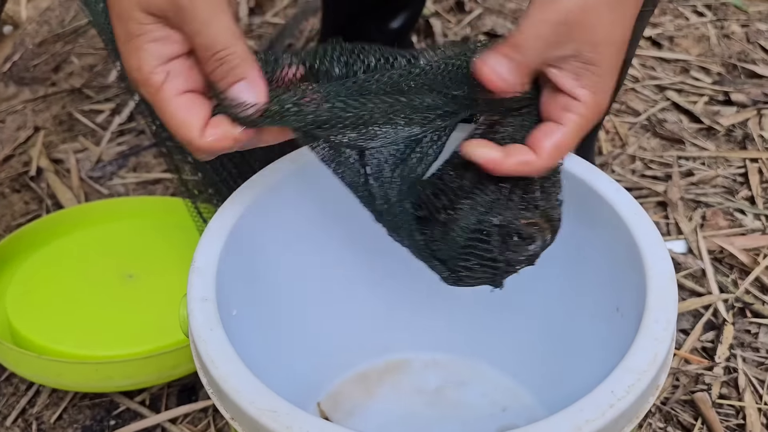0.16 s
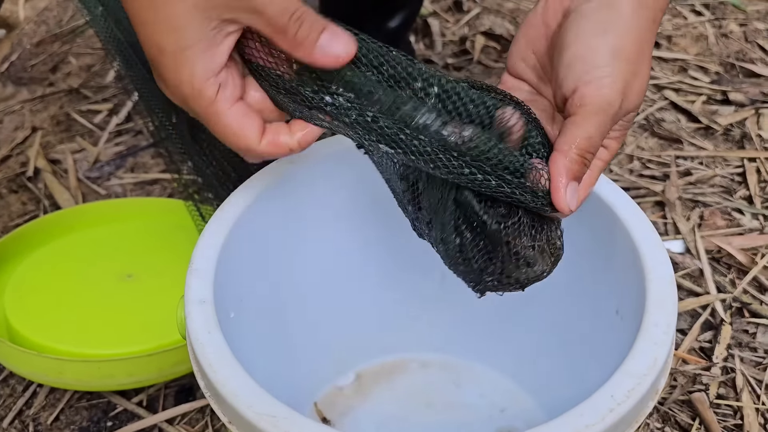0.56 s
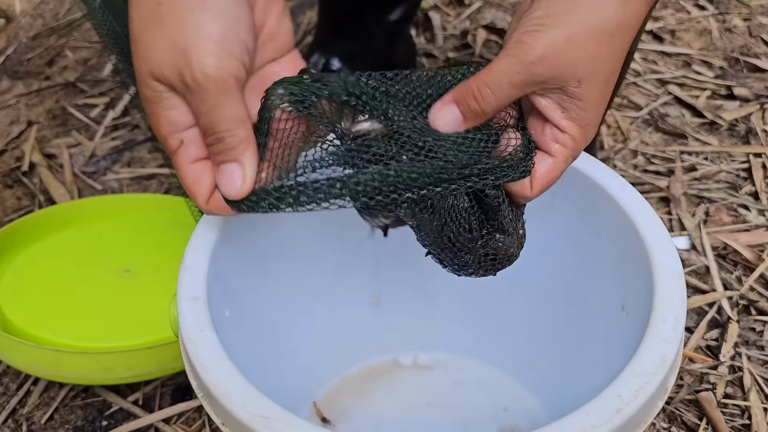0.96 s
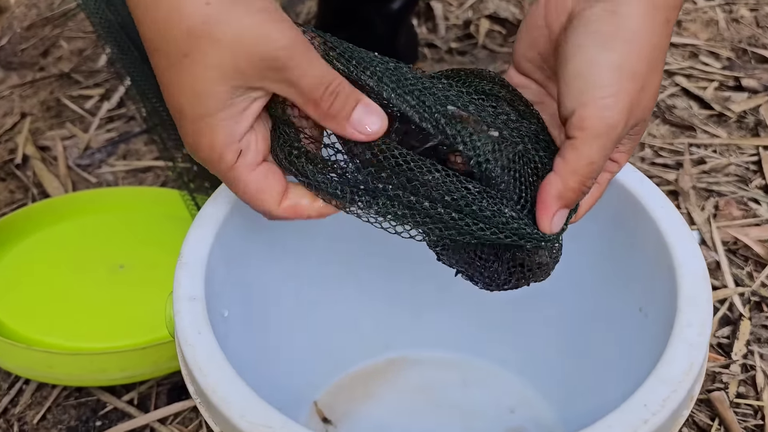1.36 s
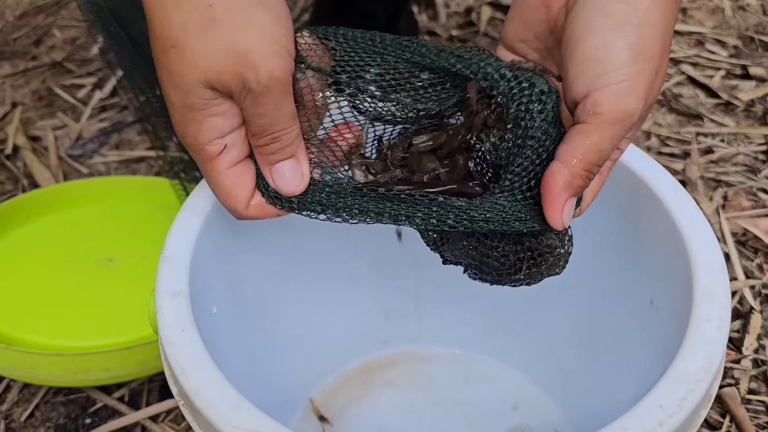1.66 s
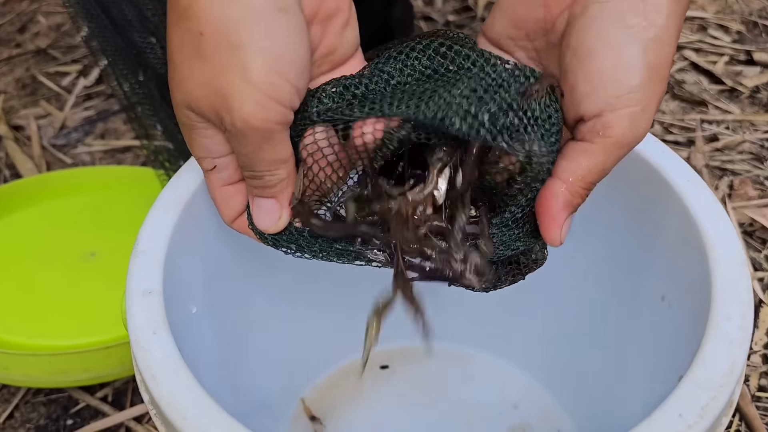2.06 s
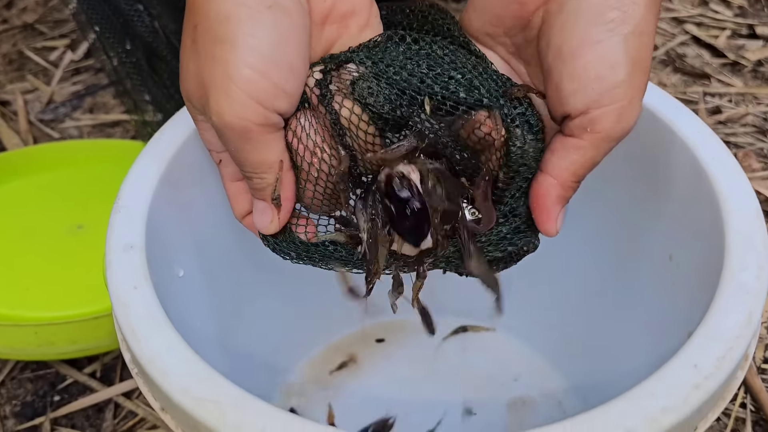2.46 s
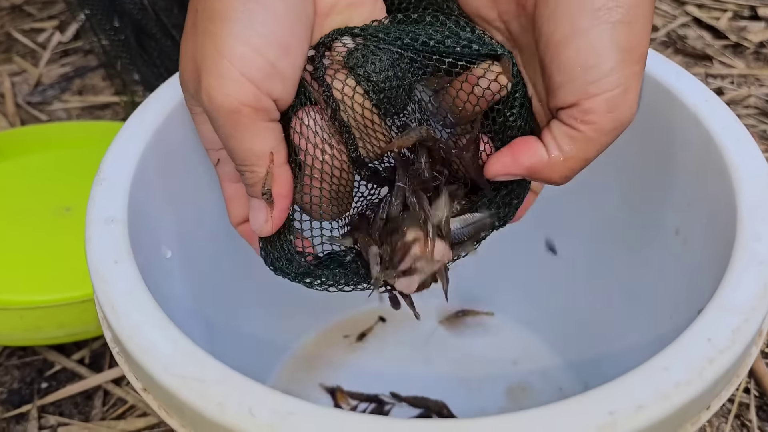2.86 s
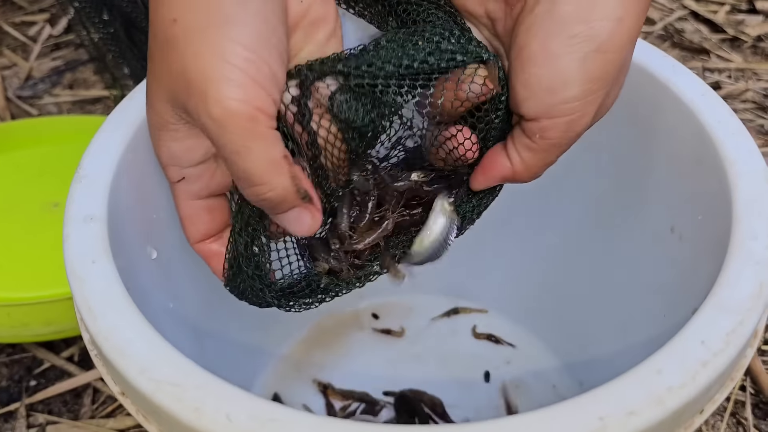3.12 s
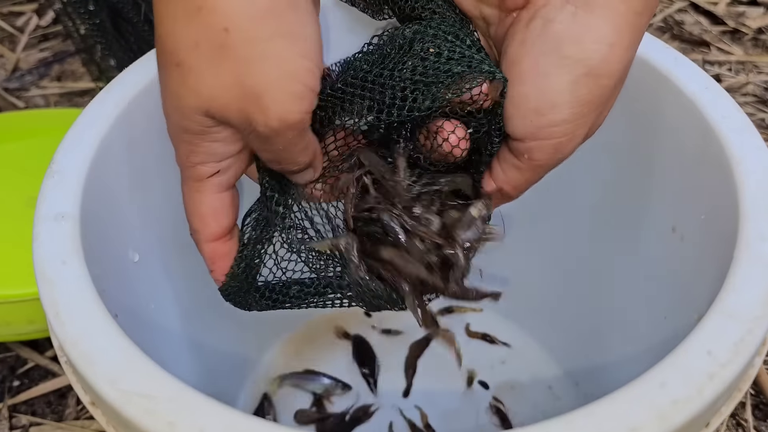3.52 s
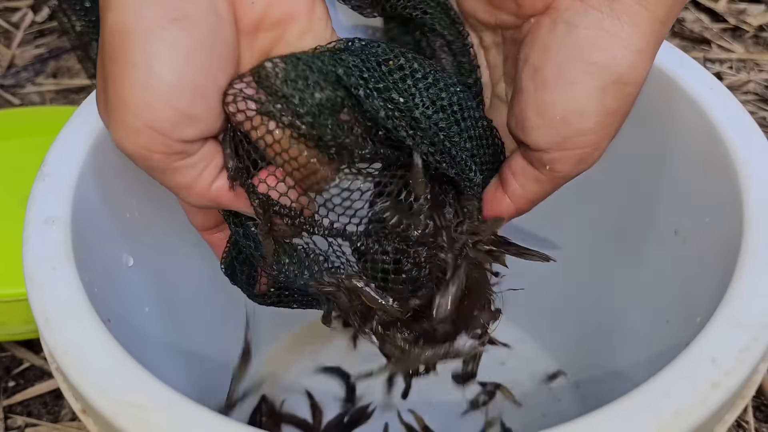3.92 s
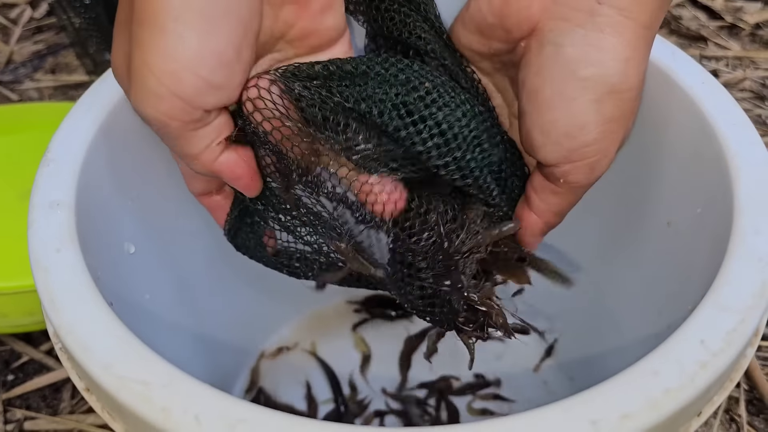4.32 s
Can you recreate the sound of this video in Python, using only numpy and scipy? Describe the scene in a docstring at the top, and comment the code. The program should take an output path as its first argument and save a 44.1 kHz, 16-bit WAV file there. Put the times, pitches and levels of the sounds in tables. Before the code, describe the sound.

Very quiet at first: distant shrilling insects, thin falling bird chirps, soft air, and faint ticks and bumps of a handled wet net. Then the small wet catch spills into a hollow bucket in uneven bursts of dull booms, short knocks and crisp snaps, some overloading the close microphone. Rubbing mesh and tiny flapping kicks continue, a little left of centre, to the end.

```python
"""Distant insects shrill and small birds chirp while hands rub a wet trap net; then its catch drops into a bucket.
Landings are modal synthesis: soft pushes excite damped modes of the hollow, the walls and the shell.
Snaps are short noise bursts ringing the bucket; the mesh is scattered grains; rubbing is jerky filtered noise.
Squirming is a patter of tiny kicks on the same modes. Birds are gliding sines, insects and air shaped noise."""
import sys
import numpy as np
from scipy import signal
from scipy.fft import rfft, irfft
from scipy.io import wavfile
from scipy.ndimage import uniform_filter1d

SR = 44100
rng = np.random.default_rng(int(sys.argv[2]) if len(sys.argv) > 2 else 0)


def transcribe(signal):
    """Save signal, clipped to [-1, 1], as a 16-bit WAV file at the path in sys.argv[1]."""
    frames = np.atleast_2d(signal).T
    limited = np.clip(frames, -1, 1)
    pcm = np.round(limited * 32767).astype(np.int16)
    wavfile.write(sys.argv[1], SR, pcm)


N = 197818  # samples

# Bodies hitting the bucket: (time [s], boom of the hollow [dB], contact [ms], smack over the boom [dB])
LANDINGS = [(0.385, -50.5, 6.7, -5), (0.726, -61, 1.9, 17), (1.17, -49.5, 5.5, 5.5),
            (1.189, -57.5, 2.9, 10.5), (1.773, -52.5, 5.2, 1), (1.844, -55, 3.7, -3),
            (2.255, -32.5, 4.3, 0), (2.2747, -19.5, 4.7, -12.5), (2.2989, -14, 5.6, -13),
            (2.3059, -12, 1.1, -5), (2.3165, -25, 5, -2), (2.3389, -15, 2.5, -18), (2.3598, -20, 1.3, 4.5),
            (2.388, -31, 5.5, 0), (2.46, -44.5, 3, 13), (2.5003, -23.5, 4.2, -8.5), (2.512, -25, 0.62, -7),
            (2.57, -25.5, 0.39, -8), (2.6371, -18.5, 2, -16), (2.6668, -13, 4.2, -21),
            (2.7272, -8, 0.44, -11), (2.7334, -1, 1.3, -9.5), (2.772, -24, 3.1, -5.5),
            (2.8325, -19.5, .5, -13.5), (2.882, -17, 0.4, -1), (2.9217, -27.5, 0.76, -25),
            (2.9745, -34, 2.8, -23), (3.122, -27.5, 1.2, -6.5), (3.1399, -15.5, 7.8, -5),
            (3.1433, -8, 4.7, -14), (3.1688, -6, 0.58, -14), (3.1964, -21, 3.3, -5),
            (3.266, -33.5, 1.3, -4), (3.3496, -21, 3.2, -21.5), (3.362, -26, 4.5, -15),
            (3.384, -28.5, 2.5, -22), (3.4183, -28.5, 1, -6.5), (3.489, -29, 0.62, -2),
            (3.5424, -46.5, 6.3, 13.5), (3.575, -27.5, 3.9, 4), (3.6308, -37, 6.7, 12),
            (3.6439, -40.5, 1, 0), (3.674, -49, 3.4, 15), (3.66, -39, 1.8, 2), (3.6825, -34.5, 2.3, -1.5),
            (3.7077, -26.5, 1.9, -34), (3.7591, -37, 1.1, -33), (3.787, -28, 2, -0.5),
            (3.7998, -34.5, 1.1, -15), (3.832, -49, 2.4, 13), (3.8507, -16.5, 3, -21),
            (3.8718, -32, 6.5, -1.5), (3.9355, -37, 3, -18), (3.973, -29.5, 4.6, -34),
            (3.9968, -33, 1.1, -22), (4.0816, -30.5, 1.2, -19), (4.123, -21.5, 5.65, -13.5),
            (4.156, -21.5, 2, -38), (4.1923, -25, 1.5, -7.5), (4.2664, -31, 1.6, -20),
            (4.302, -27, 4.3, -11), (4.3342, -21, 2.7, -15.5), (4.3558, -29.5, 1, -38),
            (4.395, -29.5, 3.1, -40)]
# The walls' knock relative to the boom [dB], and its rise per dB of smack
KNOCK_DB, KNOCK_FOLLOW = -1, 0.73
# The tail slaps down after the body: least delay [ms], further random delay [ms], level over the smack [dB]
FLOP_MS, FLOP_SPREAD_MS, FLOP_DB = 3.93, 9.0, -9.5


def landings():
    """Superposition: each impact sums a boom, a wall knock and a slap, then a weaker slap of the tail."""
    out = np.zeros((2, N))
    for s, boom_db, contact_ms, smack_db in LANDINGS:
        slap_db = boom_db + smack_db
        knock_db = boom_db + KNOCK_DB + KNOCK_FOLLOW * smack_db
        flop_s = s + (FLOP_MS + FLOP_SPREAD_MS * rng.random()) / 1000
        # the push is centred on the moment of impact
        add(out, s - contact_ms / 2000, amp(boom_db) * boom(contact_ms))
        add(out, s, amp(knock_db) * knock() + amp(slap_db) * slap())
        add(out, flop_s, amp(slap_db + FLOP_DB) * slap())
    return out


# Low modes of the hollow: (frequency [Hz], relative level [dB], t60 [s], sign and size of swing)
HOLLOW = [(165.2, -9.5, 0.11, -1.79), (214.6, 1, 0.043, 1), (314.1, 8, 0.07, -0.8)]


def boom(contact_ms, lowest_hz=125):
    """Contact filtering: a longer push favours deeper modes; a small bucket radiates no deep bass."""
    push = np.hanning(max(round(contact_ms * SR / 1000), 5))
    sound = signal.lfilter(push, 1, ring(HOLLOW, contact_s=0.0004))
    bass_cut = signal.butter(3, lowest_hz, "high", fs=SR, output="sos")
    sound = signal.sosfilt(bass_cut, sound)
    return sound / abs(sound).max()


# Wall modes: (frequency before detuning [Hz], relative level [dB], t60 [s], sign and size of swing)
WALLS = [(579, 4, 0.034, -1.19), (652.5, 6, 0.061, 1), (679, 4, 0.062, 0.61)]


def knock(spread=0.061):
    """Modal response: the damped walls ring at a slightly different pitch for each spot struck."""
    detune = 1 + spread * rng.uniform(-1.26, 1)
    modes = [(hz * detune, *rest) for hz, *rest in WALLS]
    return ring(modes, contact_s=0.0006)


# Crowded upper modes of the shell: (frequency [Hz], level before random blending [dB], t60 [s])
SHELL = [(780, -4.5, 0.015), (1030, -5, 0.0083), (1000, -7.5, 0.066), (1115, -10.5, 0.068),
         (1140, -36, 0.0226), (1399, 1.5, 0.042), (1500, -19.5, 0.053), (1764, -9.5, 0.011)]


def slap(pop_hz=1020, pop_t60=0.0061, pop_db=-2, shell_db=-5, pan_db=-3):
    """Air expulsion and shell resonance: a wet body squeezes out a short pop, and the shell rings on."""
    pop_mode = (pop_hz * rng.uniform(0.75, 1.154), 0, pop_t60, -1)
    pop = ring([pop_mode], contact_s=0.0012)
    shell = blend(SHELL, contact_s=0.000083)
    return (amp(pop_db) * pop + amp(shell_db) * shell) * lean(pan_db)


# Bright wet snaps and flicks, some on their own, some together with a landing:
# (time [s], relative level [dB], body over that [dB], top fizz over that [dB])
SNAPS = [(.402, -40, -30, -9), (0.4668, -37, -11, -5), (0.521, -40.5, -8.5, -2), (0.999, -43, -29, -10),
         (1.279, -41, -7, 1.5), (1.877, -55.5, -11, 9), (1.931, -46, -5, 3.5), (2.1178, -44, 5, -9),
         (2.258, -27.5, -1.5, -2.5), (2.297, -21, 6, -26), (2.3136, -29, 2.5, -3), (2.3797, -39.5, 3, 5.5),
         (2.652, -28, -32, -3.5), (2.7324, -18, 11, -11), (2.8, -35, -13.5, -21), (2.8825, -52, 18.5, -18),
         (2.9866, -34.5, 6, -17), (3.042, -47, .5, 3), (3.1986, -37, 6.5, -5), (3.491, -42, 10.5, -12),
         (3.5555, -33, -5, -3), (3.587, -42.5, 6, 0), (3.65, -38.5, 2.5, -11), (3.8034, -46.5, 10.5, -12),
         (3.829, -47, 14, 6), (3.882, -19.5, -1, -13.5), (4.0085, -43, 5, -6), (4.0677, -39.5, 4, -9),
         (4.125, -31.5, 0.5, -4), (4.172, -19.5, -19, -8), (4.229, -41, 5.5, -20), (4.3322, -34.5, 9, -19),
         (4.426, -36, -32, -5), (4.4585, -33.5, -27, -14)]
# Spectrum of the spray: (frequency [Hz], density [dB per Hz])
SNAP_COLOUR = [(900, -4), (1800, -1), (3000, -0.5), (4500, 2), (7000, -0.5), (8500, 2.5), (10300, -3),
               (11600, 9.5), (13500, 4.5), (16000, 5)]


def snaps(rise_s=0.00009, crack_s=0.0036, echo_s=0.011, echo_db=-16, crackle_db=2.5):
    """Double decay: a brief uneven spray fades fast, then slower as its reflections in the bucket."""
    t = np.arange(SR // 10) / SR
    decay = np.exp(-t / crack_s) + amp(echo_db) * np.exp(-t / echo_s)
    shape = (1 - np.exp(-t / rise_s)) * decay
    out = np.zeros((2, N))
    for s, db, body_db, top_db in SNAPS + wet_landings():
        unevenness = uniform_filter1d(rng.standard_normal(len(t)), size=14)
        clumps = amp(crackle_db * unit(unevenness))
        spray = unit(colour(clumps * rng.standard_normal((2, len(t))), SNAP_COLOUR))
        spray = colour(spray, [(3200, body_db), (5000, 0), (8500, 0), (12000, top_db)])
        add(out, s, in_bucket(amp(db + 4.5) * spray * shape))
    return out


# Snap of each landing: relative level [dB], its rise per dB of boom, and per dB of smack
WET_DB, WET_FOLLOW, WET_SMACK = -25.5, 0.68, 0.19
WET_BODY_DB, WET_TOP_DB = 7, -8  # colour of that snap


def wet_landings():
    """Impact scaling: the wet snap of each landing grows with its boom and its smack."""
    rows = []
    for s, boom_db, _, smack_db in LANDINGS:
        db = WET_DB + WET_FOLLOW * boom_db + WET_SMACK * smack_db
        rows.append((s, db, WET_BODY_DB, WET_TOP_DB))
    return rows


# Bright modes that snaps stir: (frequency [Hz], level before random blending [dB], t60 [s])
BRIGHT = [(2387, 5, 0.013), (2740, -5, 0.0054), (3110, 6.5, 0.014), (3855, -41, 0.026), (3790, 6.5, 0.012),
          (4500, 8, 0.017), (7060, -2.5, 0.023), (9400, -4, 0.013)]


def in_bucket(x, ring_db=-10):
    """Convolution: a crisp sound excites the bright modes of the bucket, which are added to it."""
    modes = blend(BRIGHT, contact_s=0.0016)
    modes = modes / np.linalg.norm(modes[0])
    return x + amp(ring_db) * signal.fftconvolve(x, modes, axes=1)[:, :x.shape[1]]


# Steady level of the catch squirming on the bottom: (time [s], level [dB])
SQUIRM = [(0, -66), (2.2, -79.5), (2.6, -50.5), (3.3, -57), (3.6, -45), (4.48, -54.5)]
# Flurries of tiny kicks when a clump drops in: (start [s], length [s], level before jerks [dB])
FLURRIES = [(2.288, 0.14, -34.5), (3.338, 0.14, -38.5), (3.63, 0.092, -38), (3.792, 0.068, -32),
            (4.103, 0.097, -35.5), (4.25, 0.052, -33.5), (4.336, 0.087, -49.5)]


def squirming():
    """Random impulse excitation: tiny kicks patter on the bucket's modes from four spots on the bottom."""
    patter = np.zeros((2, N))
    for spot in range(4):
        kick = amp(2.5) * boom(contact_ms=4.2) + amp(-0.5) * knock() + slap()
        clicks = grains(per_s=32, spread_db=2.5)
        patter += signal.oaconvolve(clicks[None], kick, axes=1)[:, :N]
    return activity(SQUIRM, FLURRIES, column=1) * unit(patter)


# Steady work on the net: (time [s], ticking before the mesh gain [dB], rubbing of fingers [dB])
HANDLING = [(0, -68, -60.5), (.95, -73, -69), (2.2, -66.5, -61.5), (3.28, -63.5, -60.5),
            (3.5, -58.5, -52.5), (4.48, -62, -62.5)]
# Single tugs and shakes, before jerks:
# (start [s], length [s], ticking before the mesh gain [dB], rubbing of fingers [dB])
TUGS = [(-.02, 0.14, -70, -58), (0.393, 0.13, -59, -71), (0.515, 0.096, -64, -62), (0.767, 0.1, -65, -85),
        (0.981, 0.25, -63.5, -87), (1.186, .08, -71, -74), (1.564, 0.11, -67.5, -60),
        (1.926, 0.14, -60.5, -66.5), (2.28, .17, -53.5, -49), (2.63, 0.088, -56.5, -51),
        (2.936, 0.072, -58.5, -64), (3.117, 0.11, -50.5, -43), (3.329, 0.15, -55, -58),
        (3.548, 0.06, -69, -44.5), (3.703, 0.22, -56, -55), (4.108, 0.11, -60, -48.5)]
# Spectrum of the mesh: (frequency [Hz], filter gain [dB])
MESH = [(300, -7), (900, -47), (1500, -21.5), (2500, -4), (4000, 3), (7000, 4.5), (8500, 8), (10300, -0.5),
        (11600, 7.5), (13500, 2), (16000, 6.5)]


def net(scatter_s=0.0032, echo_s=0.0092, echo_db=-12, mesh_db=8):
    """Incoherent scattering: wet threads tick over fingers and shells, and each tick scatters in the bucket."""
    t = np.arange(SR // 40) / SR
    scatter = np.exp(-t / scatter_s) + amp(echo_db) * np.exp(-t / echo_s)
    ticks = grains(per_s=1100, spread_db=3.3)
    # every tick is a puff of noise of its own, so their powers add
    power = np.maximum(signal.oaconvolve(ticks ** 2, scatter ** 2)[:N], 0)
    rustle = unit(colour(np.sqrt(power) * rng.standard_normal((2, N)), MESH))
    return amp(mesh_db) * activity(HANDLING, TUGS, column=1) * rustle


# Spectrum of the rubbing: (frequency [Hz], filter gain [dB])
RUB = [(300, -2), (700, -7.5), (1400, -1), (2500, -5), (3600, -4), (6000, -9), (12000, -33)]


def rubbing():
    """Stick-slip friction: fingers drag on the wet mesh in small uneven slips."""
    slips = amp(2.5 * drift(rate_hz=200))
    drag = colour(rng.standard_normal((2, N)), RUB) * slips
    return activity(HANDLING, TUGS, column=2) * unit(drag)


# Falling chirps of the nearer small birds: (time at the middle [s], middle pitch before rasp [Hz], level [dB])
CHIRPS = [(.086, 5570, -49.5), (.12, 5900, -52), (.179, 5910, -46.5), (.311, 5700, -53), (.469, 5800, -49),
          (.81, 5860, -49.5), (1.24, 6220, -53), (1.375, 5880, -53.5), (1.595, 5340, -51),
          (1.663, 5990, -46), (2.07, 5600, -47), (2.409, 5920, -46.5), (2.556, 5770, -49.5),
          (2.715, 5870, -48), (3.105, 6160, -47), (3.732, 5830, -44.5)]


def birds(chirp_s=0.038, fall_hz=850, rasp_hz=170, echo_db=-3, flock_db=-59):
    """Frequency modulation and diffusion: raspy falling chirps, a fainter flock and whistles, blurred by trees."""
    u = np.linspace(-.5, .5, round(chirp_s * SR))
    envelope = np.cos(np.pi * u) ** 2
    song = np.zeros((1, N))
    rasp = rasp_hz * drift(rate_hz=290)
    flock = [(when * (N / SR - .1), 5400 + 700 * height, flock_db)
             for when, height in rng.random(size=(24, 2))]
    for s, hz, db in [*CHIRPS, *flock]:
        fall = fall_hz * rng.uniform(0.39, 1.47) * u
        pitch = hz - fall + np.roll(rasp, -round(s * SR))[:len(u)]
        add(song, s - chirp_s / 2, amp(db) * glide(pitch) * envelope)
    song += whistles()
    t = np.arange(SR // 4) / SR
    # decaying noise, independent at the two ears
    trees = unit(rng.standard_normal((2, len(t))) * np.exp(-t / 0.063)) / np.sqrt(len(t))
    return song + amp(echo_db) * signal.oaconvolve(song, trees, axes=1)[:, :N]


# A far bird's drawn-out whistles, before waver and flutter:
# (start [s], length [s], pitch at the ends [Hz], rise in the middle [Hz], level [dB])
WHISTLES = [(0.098, 0.287, 2127, -40.5, -65), (0.499, 0.24, 2020, 45.5, -70.5),
            (3.006, 0.28, 1750, 201.5, -59)]


def whistles(waver_hz=35, waver_share=0.38, flutter_db=3.5):
    """Joint pitch and level modulation: each whistle follows one arch; a wider bend wavers more."""
    song = np.zeros((1, N))
    for s, length, hz, rise_hz, db in WHISTLES:
        arch = np.sin(np.linspace(0, np.pi, round(length * SR))).clip(0)
        waver = (waver_hz + waver_share * abs(rise_hz)) * drift(rate_hz=130)[:len(arch)]
        pitch = hz + rise_hz * arch + waver
        level = amp(db + flutter_db * drift(rate_hz=32)[:len(arch)]) * np.sqrt(arch)
        add(song, s, level * glide(pitch))
    return song


# Spectrum of the insect chorus: (frequency [Hz], density [dB per Hz])
INSECTS = [(3700, -38), (4050, -9.5), (4300, 5), (4750, 3), (5200, -4.5), (5900, -7.5), (6400, -14),
           (6800, -32), (7200, 0.5), (7600, -15.5), (9000, -67)]
INSECTS_DB = -56  # level before the shimmer


def insects():
    """Amplitude modulation: narrow bands of noise shimmer as a distant chorus."""
    chorus = unit(colour(rng.standard_normal((2, N)), INSECTS))
    shimmer = amp(1.17 * drift(rate_hz=140))
    return amp(INSECTS_DB) * chorus * shimmer


# Spectrum of the outdoor air: (frequency [Hz], filter gain [dB])
AIR = [(20, -6), (60, 5), (150, 2), (300, -16), (450, 2.5), (680, 2), (1100, -13), (2000, -10), (3200, -5),
       (6500, -41), (8500, -22), (10300, -54), (12000, -2.5), (16000, 3.5)]
AIR_DB = -61.5  # level before the breeze and the lean to the left


def outdoor_air():
    """Interaural coherence: soft noise shared by both ears mostly below the treble, slowly swaying in level."""
    shared = colour(rng.standard_normal(N), [(100, 7.0), (700, 2.0), (1500, 12.0), (4000, -2)])
    breeze = amp(0.8 * drift(rate_hz=4))
    air = unit(colour(rng.standard_normal((2, N)) + shared, AIR)) * breeze
    return amp(AIR_DB) * air * lean(1.8)


def ring(modes, contact_s):
    """Modal superposition: decaying sines after a soft push, scaled to peak 1."""
    t = np.arange(SR // 9) / SR
    sound = np.zeros(len(t))
    for hz, db, t60, way in modes:
        sound += way * amp(db - 60 * t / t60) * np.sin(2 * np.pi * hz * t)
    sound *= 1 - np.exp(-t / contact_s)
    return sound / abs(sound).max()


def blend(modes, contact_s):
    """Mode participation: each spot stirs the modes differently, and each ear hears another blend."""
    ways = rng.standard_normal(len(modes)) + 0.54 * rng.standard_normal((2, len(modes)))
    ears = [[(*mode, way) for mode, way in zip(modes, ear)] for ear in ways]
    return np.array([ring(ear, contact_s) for ear in ears])


def activity(steady, rows, column, uneven_db=3.0):
    """Power addition: gain of a steady activity together with its bouts, which come in uneven jerks."""
    jerks = amp(uneven_db * drift(rate_hz=54))
    return np.hypot(amp(curve(steady, column)), bouts(rows, column + 1) * jerks)


SWELL_S, EASE_S = 0.017, 0.053  # full build-up and fade of a tug or a flurry


def bouts(rows, column):
    """Envelope shaping: gain of timed bouts that each swell, hold and ease off."""
    t, gain = np.arange(N) / SR, np.zeros(N)
    for row in rows:
        start, length = row[:2]
        ramp = np.clip(np.minimum((t - start) / SWELL_S, (start + length - t) / EASE_S), 0, 1)
        gain += amp(row[column]) * np.sin(np.pi / 2 * ramp) ** 2
    return gain


def grains(per_s, spread_db):
    """Random point process: sparse clicks of uneven size and either sign."""
    size = amp(spread_db * np.minimum(rng.exponential(1, N), 4))
    return size * rng.choice([-1, 1], N) * (rng.random(N) < per_s / SR)


def drift(rate_hz):
    """Low-pass noise: random wandering of rms 1, slower for a lower rate."""
    bins = np.fft.rfftfreq(N, 1 / SR)
    return unit(irfft(rfft(rng.standard_normal(N)) * np.exp(-(bins / rate_hz) ** 2), N))


def glide(pitch):
    """Phase integration: a sine that follows a pitch given in Hz at every sample."""
    return np.sin(2 * np.pi * np.cumsum(pitch) / SR)


def colour(x, points):
    """Spectral filtering: gains in dB interpolated over log frequency."""
    hz, db = np.transpose(points)
    bins = np.fft.rfftfreq(x.shape[-1], 1 / SR)
    gain = amp(np.interp(np.log(bins + 1), np.log(hz), db))
    return irfft(rfft(x) * gain, x.shape[-1])


def curve(rows, column=1):
    """Linear interpolation: one column of a timed table at every sample."""
    rows = np.asarray(rows)
    return np.interp(np.arange(N) / SR, rows[:, 0], rows[:, column])


def add(mix, s, sound):
    """Superposition: mixes a sound in at time s, cut at the end of the mix."""
    part = mix[:, max(round(s * SR), 0):][:, :sound.shape[-1]]
    part += sound[..., :part.shape[1]]


def amp(db):
    """Logarithmic level: decibels to gain."""
    return 10 ** (np.asarray(db) / 20)


def unit(x):
    """Power normalisation: scales to rms 1."""
    return x / np.sqrt(np.mean(x ** 2) + 1e-20)


def lean(db):
    """Interaural level difference: left and right gains, positive toward the left."""
    return amp(np.array([[db], [-db]]) / 2)


LEFT_DB = 3.5  # level advantage given to the left ear


def from_left(x, count):
    """Interaural cues: the left ear gets the sound louder, and a few samples earlier."""
    right = np.pad(x[1], (count, 0))[:N]
    return np.array([x[0], right]) * lean(LEFT_DB)


def scene():
    """Near and far field: the bucket and net close by, the countryside behind."""
    near = landings() + snaps() + squirming() + net() + rubbing()
    return from_left(near, count=3) + birds() + insects() + outdoor_air()


EDGE_HZ = 15850  # upper band limit


def record(dry, knee=0.35, bend=0.47):
    """Nonlinear response: peaks above the knee bend and overload the microphone; then the band limit."""
    excess = np.maximum(abs(dry) - knee, 0)
    # the bend always pulls downward, so positive and negative peaks differ
    clipped = np.clip(dry - bend * excess ** 2, -1, 1)
    band_limit = signal.firwin(511, EDGE_HZ, window=("kaiser", 9), fs=SR)
    return signal.oaconvolve(clipped, band_limit[None], "same", axes=1)


dry = scene()
out = record(dry)
transcribe(out)
```